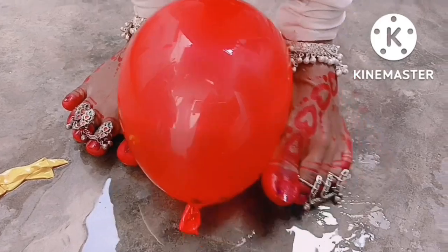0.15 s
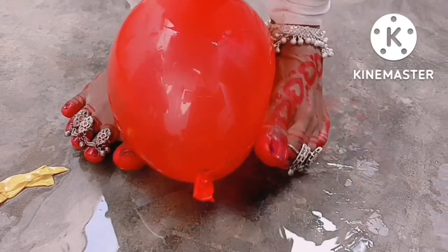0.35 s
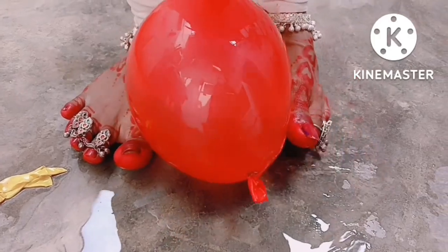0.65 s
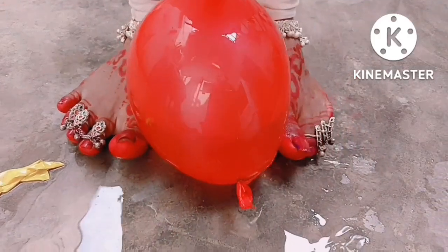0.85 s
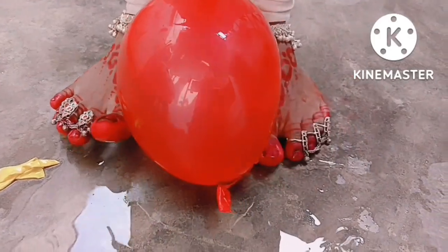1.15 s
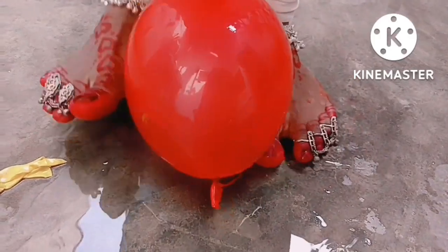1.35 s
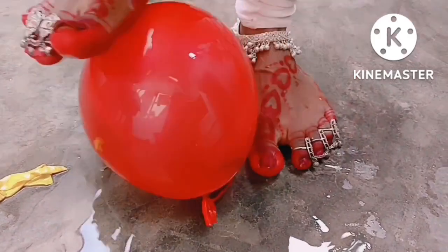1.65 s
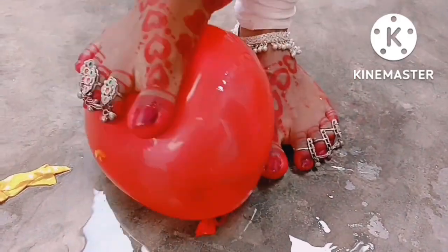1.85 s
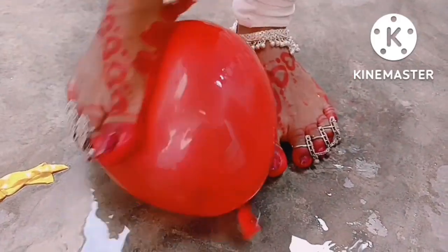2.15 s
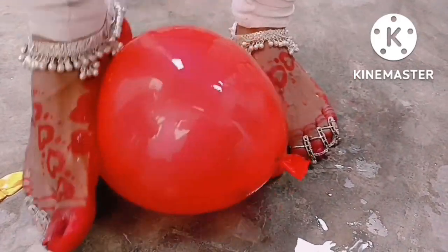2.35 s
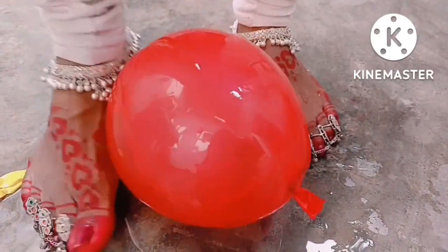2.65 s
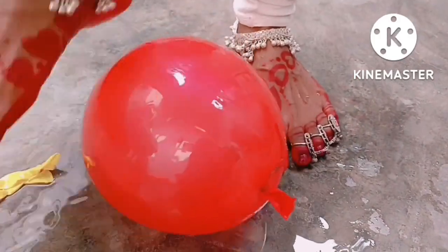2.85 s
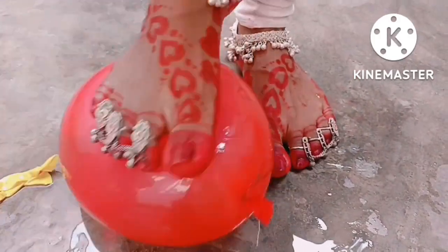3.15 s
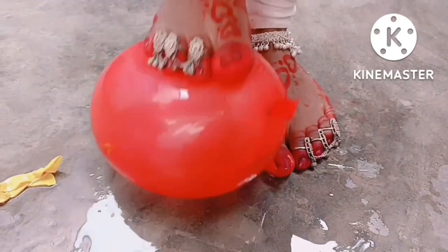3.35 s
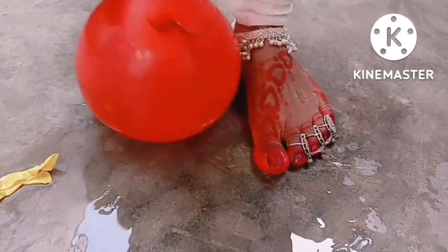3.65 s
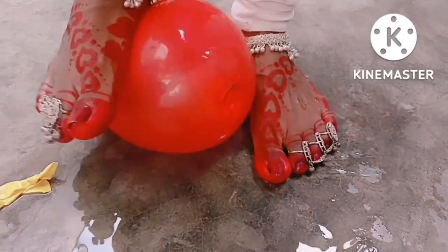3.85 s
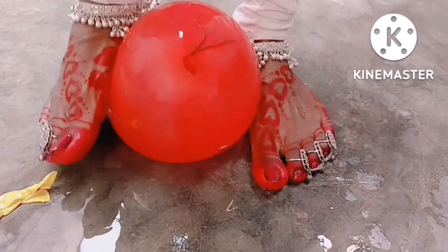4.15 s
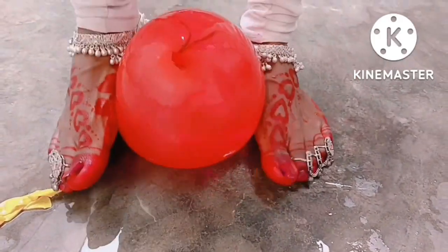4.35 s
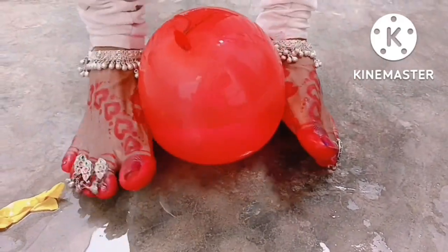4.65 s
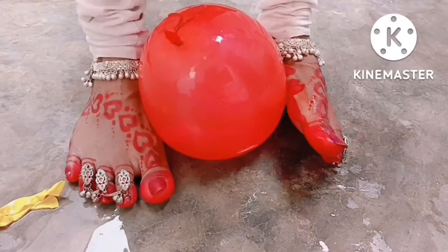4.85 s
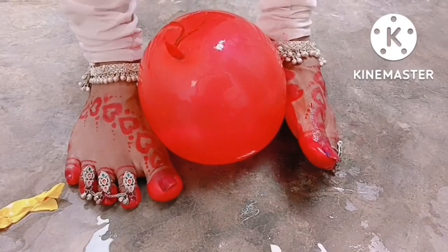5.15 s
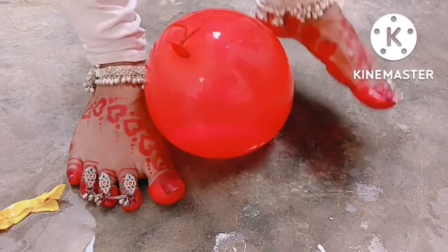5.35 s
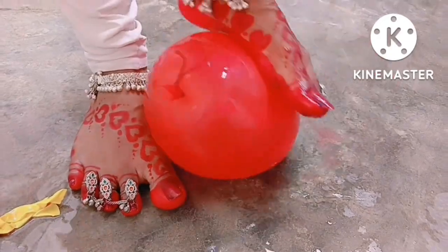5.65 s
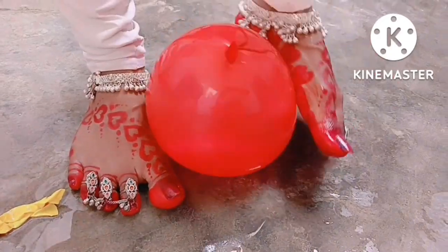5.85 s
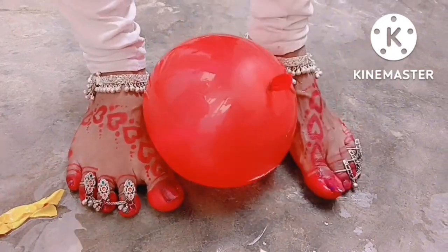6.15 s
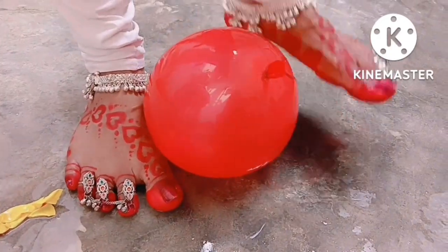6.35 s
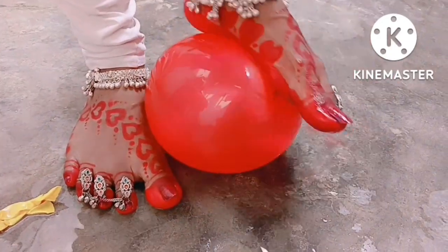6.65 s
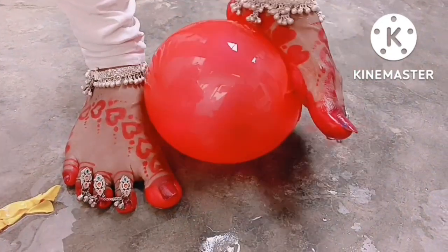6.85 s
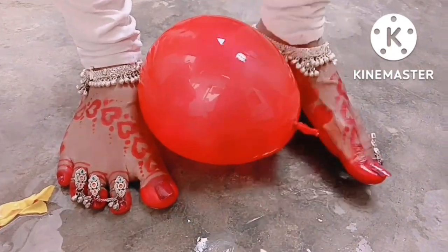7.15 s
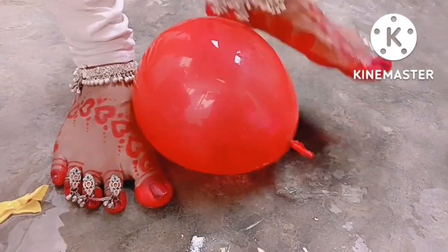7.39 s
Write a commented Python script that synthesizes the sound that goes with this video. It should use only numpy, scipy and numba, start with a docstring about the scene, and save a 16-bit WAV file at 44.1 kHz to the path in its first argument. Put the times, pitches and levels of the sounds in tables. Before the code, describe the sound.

Close stereo sound in a small yard with a very short, dry tail and faint air noise. At first it is nearly quiet: tiny anklet bells chink at about 0.1 s, with soft far tones under half a second. Around 1 s a dull rubber slip thuds; from 1.4 to 1.7 s there is low creaking and short squeaks that swoop upward, dip and rise again. At 2.1 s comes the loudest low thump and creak, with a wavering squeak. Bells jingle brightly at 2.6-3.2 s as wet rubber scrapes the floor and a toe ring clicks. A quickening stutter rubs at 3.3-3.4 s, then a hollow squeaky burst at 3.9 s. Scattered slips and chinks follow through 5 s. Sharper ring ticks and scraping land near 5.8-5.9 s, a low squeak at 6.7 s, and another hollow rub with thin bells at 7.1-7.4 s before it fades.

```python
"""Tiny anklet bells chink first, each a decaying sine; then bare feet roll and press a rubber balloon
on a wet concrete floor. Skin sticks and slips on the rubber: creaks, single slips and a stutter excite
resonances of the balloon's wall and air, and squeaks are harmonic tones on their own slip rate.
Wet rubber scrapes the floor in showers of chirps and toe rings tick as short partials.
A brief noise tail is the small yard's answer, over faint air noise and soft far tones."""
import sys
import numpy as np
from scipy import signal
from scipy.fft import rfft, irfft
from scipy.io import wavfile
from scipy.ndimage import uniform_filter1d
from numba import njit

SR = 44100
rng = np.random.default_rng(int(sys.argv[2]) if len(sys.argv) > 2 else 0)


def inscribe(sig):
    """Save sig as 16-bit PCM at rate SR to the path in sys.argv[1].

    A 1-D sig is mono; a 2-D sig holds one channel per row.
    Samples are clipped to [-1, 1] before scaling.
    """
    pcm = np.round(np.clip(np.atleast_2d(sig).T, -1, 1) * 32767)
    wavfile.write(sys.argv[1], SR, pcm.astype(np.int16))


N = 331632  # samples

# Modes of the air inside. Each row: resonance in Hz, bandwidth in Hz, relative gain in dB.
AIR_MODES = [(630, 90, -2), (770, 80, 0), (890, 70, -1)]
# Upper modes of the rubber wall. Each row: resonance in Hz, bandwidth in Hz, relative gain in dB.
UPPER_MODES = [(1350, 350, -6), (1780, 200, 0), (2120, 250, -1), (2780, 250, -2), (3450, 450, -5)]


def balloon(creak_gain, air_gain):
    """Stick-slip friction: a train of slips excites wall and air; single slips and squeaks join it."""
    slip_hz = 260 * np.exp(.36 * fits(rate=28))
    train = slips(slip_hz, jitter=.14, scatter_db=3) + 0.05 * rng.standard_normal(N)
    creak = even(squeeze(wall(train))) * creak_gain
    hum = even(air(train)) * air_gain
    return creak + hum + single_slips() + squeaks()


def single_slips():
    """Impulse response: each sudden release of the skin rings wall, air and upper modes once."""
    # Each row: ring peak in seconds, relative wall level in dB, air drive minus wall drive in dB.
    slip_rows = [(0.944, -61, 17), (0.991, -17.5, -15.5), (1.039, -17, -18), (1.678, -34.5, 7.5),
                 (2.036, -36.5, 0), (2.05, -30, 0), (2.071, -24, -4), (2.085, -8.5, -43),
                 (2.859, -23.5, 0.5), (3, -37, 7.5), (3.905, -20.5, -1), (3.915, -26, -4),
                 (3.925, -19.5, 2.5), (3.943, -20, 7), (3.954, -27, 5), (4.219, -29, 2.5),
                 (4.237, -19.5, -6.5), (4.256, -27, -1.5), (4.358, -31.5, 1), (4.393, -30, -4.5),
                 (4.712, -22.5, -8), (4.727, -26, -10), (4.748, -20, -10.5), (4.762, -25.5, -22),
                 (4.784, -21.5, -18), (4.794, -30.5, -12), (5.025, -20.5, -14.5), (5.593, -28, -8),
                 (5.67, -20.5, -4), (5.682, -19.5, -5.5), (6.022, -30.5, 0), (6.116, -24, -13),
                 (6.151, -26, -28), (6.222, -31.5, -6.5), (6.787, -21.5, -8.5)]
    s, db, air_rel_db = np.transpose(slip_rows)
    wall_blows, air_blows = np.zeros(N), np.zeros(N)
    at = ((s - 0.0008) * SR).astype(int)  # the skin starts to let go just before the ring peaks
    wall_blows[at], air_blows[at] = undb(db), undb(db + air_rel_db)
    out = wall(push(wall_blows, 0.0008)) * undb(9)
    out += air(push(air_blows, 0.0014)) * undb(22.0)
    upper = steep(ring(wall_blows + air_blows, UPPER_MODES), 2060, "low")
    return out + upper * undb(12.5)


def squeaks():
    """Sustained stick-slip is periodic: harmonics of the slip rate, some raised by the modes."""
    # One list per squeak. Each row: time in seconds, mean slip rate in Hz, relative level in dB.
    squeak_curves = [
        [(1.46, 805, -35), (1.478, 865, -29.5), (1.495, 988, -31), (1.515, 1130, -34.5)],
        [(1.515, 803.3, -30.5), (1.53, 492, -36), (1.58, 394.6, -31), (1.602, 474, -32.5), (1.62, 767, -26.5),
         (1.648, 935, -35.5)],
        [(2.085, 250.1, -45), (2.11, 402.6, -24.5), (2.15, 317.4, -29.5), (2.188, 425.4, -28.5),
         (2.23, 400.6, -33)],
        [(1.36, 125, -45), (1.41, 117.6, -40.5), (1.475, 124, -43)],
        [(3.866, 790, -26), (3.912, 827, -33)],
        [(6.6, 209.9, -42), (6.655, 243.6, -37), (6.685, 463.7, -38.5), (6.71, 481.6, -37), (6.74, 264.4, -35),
         (6.8, 194.4, -42.5)],
    ]
    noise = ring(rng.standard_normal(N), AIR_MODES + UPPER_MODES)
    rasp = unit(steep(noise, 2600, "low"))
    waver = unit(uniform_filter1d(rng.standard_normal((2, N)), size=150))
    sung = 0
    for squeak in squeak_curves:
        hz = read(squeak)[0]
        db = read(squeak, outside=-150)[1]
        phase = 2 * np.pi * np.cumsum(hz * (1 + .022 * waver[0])) / SR
        tone = sum(.6 ** k * np.sin((k + 1) * phase) for k in range(8))
        tone *= 1 + 0.32 * np.cos(phase / 2) * (waver[1] > 0)  # at times strong and weak slips alternate
        tone += 0.061 * (1 + np.cos(phase)) * rasp  # a rasp on every slip
        level = uniform_filter1d(undb(db), size=350) * undb(2 * waver[1])
        sung += np.sqrt(2) * tone * level
    sung += 0.24 * ring(sung, AIR_MODES + UPPER_MODES)  # overtones that meet a mode stand out
    return steep(steep(sung, 70, "high"), 3000, "low")


def stutter():
    """Slow stick-slip under the sole: nearly even slips quicken and ring air, wall and upper modes."""
    # Each row: time in seconds, slip rate in Hz, relative level in dB, upper modes minus air in dB.
    stutter_curve = [(3.262, 78.25, -48.5, 8), (3.3, 111.9, -43, 7), (3.36, 124.9, -31.5, -12),
                     (3.39, 199, -33.5, -0.5), (3.43, 260, -47, -6)]
    train = slips(read(stutter_curve)[0], jitter=.12, scatter_db=3)
    gain, bright = undb(read(stutter_curve, outside=-150)[1:])
    upper = steep(steep(ring(train, UPPER_MODES), 3260, "low"), 3800, "low")
    return (unit(air(train)) + 0.34 * unit(wall(train)) + bright * unit(upper)) * gain


def air(x):
    """Cavity resonance: the air inside rings mainly between 0.6 and 1 kHz."""
    x = steep(ring(x, AIR_MODES), 966, "low")
    return steep(steep(x, 1036, "low"), 607, "high")


def wall(x):
    """Membrane resonance: the low modes of the rubber wall thud."""
    # Modes of the wall at rest. Each row: resonance in Hz, bandwidth in Hz, relative gain in dB.
    wall_modes = [(125.5, 29, -2), (190.3, 54, 5), (267, 89, -3), (353, 103, 0.5)]
    return steep(steep(ring(x, wall_modes), 444, "low"), 112.7, "high")


def squeeze(x):
    """Tension sets pitch: as pressure stretches the rubber, reading speed slides all modes together."""
    return np.interp(np.cumsum(1 + .12 * fits(rate=9)) % N, np.arange(N), x)


def slips(hz, jitter, scatter_db):
    """Relaxation oscillation: one pulse each time the skin lets go; gaps and sizes vary."""
    chance = rng.standard_normal((N // 40, 2))
    steps = np.cumsum(np.exp(jitter * chance[:, 0]))
    at = np.searchsorted(np.cumsum(hz) / SR, steps)
    inside = at < N
    out = np.zeros(N)
    np.add.at(out, at[inside], undb(scatter_db * chance[inside, 1]))
    return out


def push(x, s):
    """Finite release time: skin lets go over s seconds, which softens each pulse."""
    return signal.lfilter(np.hanning(int(s * SR)), 1, x)


def scrape(drag_gain, fine_gain):
    """Friction noise: wet rubber on concrete sheds chirps around the upper modes and a finer hiss."""
    hz, width, db = np.array(UPPER_MODES)[rng.integers(len(UPPER_MODES), size=9000)].T
    hz = hz + .6 * width * rng.standard_normal(len(hz))
    rough = grit(hz, db, t60=.024, spread_db=1.4, pan_db=3)
    hiss_hz = rng.uniform(3650.0, 8280.0, size=12000)
    hiss = grit(hiss_hz, 0, t60=0.0068, spread_db=2, pan_db=3.5)
    jerks = undb(2 * fits(rate=31))
    return even(rough * jerks) * drag_gain + even(hiss * jerks) * fine_gain


def grit(hz, db, t60, spread_db, pan_db):
    """Superposed micro-impacts: decaying chirps of unequal size, one per pitch, strewn over time."""
    chance = rng.random((len(hz), 2)).T
    size_db = db - spread_db * np.log(chance[1] + 0.019)
    return unit(strike(chance[0] * N / SR, hz, np.full(len(hz), t60), size_db, pan_db, turn=1.0))


def toe_rings():
    """Modal impact: each tick is a light touch, then the blow, with a few fast-decaying partials."""
    # Each row: time in seconds, relative level in dB, nominal pitch in Hz.
    tick_rows = [(2.136, -20, 2590), (2.8586, -14, 2430), (3.0036, -30.5, 1740), (3.388, -27.5, 1700),
                 (3.8132, -23, 2330), (4.0698, -20, 1390), (4.09, -33, 1980), (4.128, -26, 3650),
                 (4.336, -29, 3380), (5.7866, -15.5, 1960), (5.871, -26, 2210), (5.915, -29, 3170),
                 (5.9415, -10.5, 2124)]
    # Each row: nominal multiple of the pitch, relative level in dB.
    partials = [(1.001, 3.5), (1.429, -5), (1.75, -10), (2.5, -10)]
    s, db, hz = np.transpose(tick_rows)
    t60 = np.full(len(s), .015)
    out = 0
    for multiple, part_db in partials:
        for late, late_db in [(-.002, -7.5), (.001, -2.5)]:  # touch, blow: (s, dB)
            detune = 1 + 0.042 * rng.standard_normal(len(s)) * (multiple > 1)
            level_db = db + part_db + late_db
            out = out + strike(s + late, hz * multiple * detune, t60, level_db, pan_db=5.0, turn=0.79)
    return out


def anklets():
    """Struck small resonators: a random shower of weak chinks and rustle under the loud chinks."""
    # Shakes of an ankle. Each row: peak in seconds, rise in seconds, fall in seconds,
    # relative bell level in dB.
    shakes = [(0.172, 0.15, 0.2, -40), (0.434, 0.0039, 0.12, -47.5), (0.659, 0.036, 0.52, -50.5),
              (1.399, 0.31, 0.19, -44), (1.759, 0.44, 0.19, -54.5), (2.118, 0.042, 0.84, -43),
              (2.522, 0.24, 0.058, -32), (2.68, 0.18, 0.66, -30.5), (3.607, 0.16, 1.1, -37.5),
              (3.876, 0.1, 0.13, -27.5), (3.93, .1, 0.79, -38.5), (4.65, 0.46, 0.17, -47),
              (4.759, 0.041, 0.12, -27.5), (5.051, 0.067, 0.079, -43.5), (5.545, 1.27, 3, -40.5),
              (6.286, 0.49, 0.11, -41.5), (6.712, 0.74, 0.12, -39.5), (7.109, 0.06, 0.73, -36.5),
              (7.363, 0.62, 0.26, -33.5)]
    # Bell level between shakes. One column: relative level in dB.
    shake_rest_db = [-95]
    shake_gain = swells(shakes, shake_rest_db)[0]
    moving = (unit(bell_shower()) + 0.36 * unit(bell_rustle())) * undb(3.6 * fits(rate=45))
    return even(moving) * shake_gain + loud_chinks()


def bell_shower():
    """Random impacts: one jolt wakes three bells, each a brief decaying sine."""
    # One column: nominal bell pitch in Hz.
    bells_hz = [9490, 10400, 10460, 11240, 11600, 11900, 13300]
    when, which, delay, size = rng.random((2400, 4)).T
    s = np.repeat(when[::3], 3) * N / SR + .003 * delay
    hz = np.array(bells_hz)[(which * len(bells_hz)).astype(int)]
    hz = hz * (1 + 0.111 * (rng.random(len(s)) - .5))
    t60 = 0.0035 + 0.041 * delay ** 2
    db = -4.5 * np.log(np.repeat(size[::3], 3) + 0.0055) - 6 * size
    return strike(s, hz, t60, db, pan_db=11.5, turn=1.0)


def bell_rustle():
    """Dense contacts merge into band noise."""
    return steep(rng.standard_normal((2, N)), [8500, 14200], "band")


def loud_chinks():
    """Clapper impact: a ringing bell, the clapper's noise burst and a faster-dying neighbour bell."""
    # Each row: time in seconds, relative level in dB, pitch in Hz.
    chink_rows = [(0.135, -31, 12400), (2.2217, -31.5, 9740), (2.6324, -29, 10430), (2.663, -15.5, 11640),
                  (2.9824, -24.5, 9980), (3.033, -21.5, 9850), (3.148, -36, 12700), (3.205, -41, 10600),
                  (3.2187, -35.5, 9970), (3.5686, -29, 10800), (3.873, -20.5, 9780), (4.394, -18, 11140),
                  (4.518, -37, 11570), (4.723, -29, 11000), (4.7536, -24.5, 11800), (4.9464, -37, 12110),
                  (5.027, -28.5, 7810), (5.033, -24.5, 12560), (6.154, -23, 11940), (6.2555, -21.5, 11720),
                  (6.5316, -24.5, 9000), (6.6694, -25.5, 8740), (6.71, -24.5, 10480), (7.095, -26, 12880),
                  (7.1477, -24, 13150), (7.327, -22, 10860), (7.3678, -20.5, 12600)]
    s, db, hz = np.transpose(chink_rows)
    out = strike(s, hz, np.full(len(s), .045), db + 0.5, pan_db=8.5, turn=3.07)
    blows = np.zeros(N)
    blows[(s * SR).astype(int)] = undb(db - 16.0)
    clack = rng.standard_normal((2, 600)) * np.exp(-np.arange(600) / (0.0043 * SR))
    rattle = signal.fftconvolve(ports(blows, pan_db=4.5), clack, axes=1)[:, :N]
    out += steep(rattle, 2900, "high")
    neighbour_hz = hz * (0.661 + 0.37 * rng.random(len(s)))
    return out + strike(s, neighbour_hz, np.full(len(s), .006), db - 4.5, pan_db=-4.0, turn=0.23)


def echoes(x, t60, db):
    """Diffuse reverberation off floor, legs and walls: unrelated noise tails, weak in the bass."""
    t = np.arange(int(t60 * SR)) / SR
    tail = rng.standard_normal((2, len(t))) * np.exp(-np.log(1000) * t / t60) * (t > .002)
    tail = signal.lfilter(*signal.butter(1, 90, "high", fs=SR), tail)
    tail = tail / np.sqrt(np.sum(tail[0] ** 2))
    return x + undb(db) * signal.fftconvolve(x, tail, axes=1)[:, :N]


def yard():
    """Diffuse-field coherence: air noise most alike left and right in the bass, plus far tones."""
    # Spectrum of the air noise. Each row: frequency in Hz, relative spectral level in dB.
    air_spectrum = [(25, 0.5), (80, 14), (300, -16.5), (1200, -12.5), (5000, -11), (12000, -24)]
    # Each row: start in seconds, end in seconds, frequency in Hz, mean level in dB.
    far_tones = [(0.275, 0.323, 240, -56), (0.45, 0.535, 215, -55), (0.37, 0.476, 420, -51),
                 (7.317, 7.562, 322, -49)]
    f = np.fft.rfftfreq(N, 1 / SR) + 1
    curve_hz, curve_db = np.transpose(air_spectrum)
    gain = undb(np.interp(np.log(f), np.log(curve_hz), curve_db))
    mid, side = rfft(rng.standard_normal((2, N)))
    side = side * np.clip(f / 1500 + 0.15, 0, 1)
    out = unit(irfft(gain * np.array([mid + side, mid - side]), N)) * undb(-67.5)
    t = np.arange(N) / SR
    for start, end, hz, db in far_tones:
        swell = np.sin(np.pi * np.clip((t - start) / (end - start), 0, 1))
        out += undb(db + 3.4 * fits(rate=30)) * np.sin(2 * np.pi * hz * t) * swell
    return out


def swells(table, rest_db):
    """Incoherent addition: movements rise and fall evenly in dB, adding in power over a resting level."""
    swing_db = 30  # climbed in the rise time, sunk in the fall time
    t = np.arange(0, N + 32, 32) / SR
    power = 0
    for s, rise, fall, *db in table:
        down = np.maximum((s - t) / max(rise, 1e-3), (t - s) / max(fall, 1e-3))
        power = power + undb(np.array(db)[:, None] - swing_db * down) ** 2
    gains = np.sqrt(power + undb(rest_db)[:, None] ** 2)
    return [np.interp(np.arange(N) / SR, t, g) for g in gains]


def fits(rate):
    """Irregular motion: random levels held 1 / rate seconds and joined smoothly."""
    k = int(SR / rate)
    return uniform_filter1d(np.repeat(rng.standard_normal(N // k + 1), k)[:N], size=k // 3)


def ports(x, pan_db):
    """Time and level difference: right leads by a fifth of a millisecond; positive pan favours left."""
    return np.array([np.roll(x, shift=8), x]) * undb([[pan_db / 2], [-pan_db / 2]])


def strike(s, hz, t60, db, pan_db, turn):
    """Level panning: positive pan favours left; chance turns the phase of each path."""
    spin = np.exp(1j * turn * rng.standard_normal(len(s)))
    left = undb(db + pan_db / 2) * spin
    right = undb(db - pan_db / 2) / spin
    return pings(s, hz, t60, left, right, 0.00011 * SR, N)


@njit
def pings(s, hz, t60, left, right, soft, n):
    """Free damped vibration: decaying sines with their own complex gain in each channel."""
    out = np.zeros((2, n))
    for k in range(len(s)):
        p = np.exp(2j * np.pi * hz[k] / SR - np.log(1000) / (t60[k] * SR))
        z = 1 + 0j
        i0 = int(s[k] * SR)
        for i in range(i0, min(n, i0 + int(t60[k] * SR))):
            rise = min((i - i0) / soft, 1.)
            out[0, i] += rise * (left[k] * z).imag
            out[1, i] += rise * (right[k] * z).imag
            z *= p
    return out


def ring(x, modes):
    """Modal superposition: a sum of two-pole resonances."""
    out = 0
    for hz, width, db in modes:
        out = out + undb(db) * signal.lfilter(*signal.iirpeak(hz, hz / width, SR), x)
    return out


def steep(x, hz, kind):
    """Band limiting by a Butterworth filter of design order four."""
    return signal.sosfilt(signal.butter(4, hz, kind, fs=SR, output="sos"), x)


def even(x):
    """Short-time rms about 1 over a tenth of a second: grain stays, motion sets the level."""
    power = uniform_filter1d(np.mean(np.atleast_2d(x) ** 2, axis=0), size=SR // 10)
    return x / np.sqrt(power + 1e-18)


def unit(x):
    """Power normalisation to rms 1."""
    return x / np.sqrt(np.mean(x ** 2) + 1e-18)


def undb(db):
    """Logarithmic level: dB to amplitude gain."""
    return 10 ** (np.asarray(db) / 20)


def read(table, outside=None):
    """Linear interpolation: each column of a curve, one value a sample."""
    s, *columns = np.transpose(table)
    return [np.interp(np.arange(N) / SR, s, c, outside, outside) for c in columns]


def scene():
    """Superposition of near sources and their echoes over the yard; the balloon is slightly louder left."""
    # Strokes of a foot over the balloon. Each row: peak in seconds, rise in seconds, fall in seconds,
    # then relative levels in dB of wall creak, air ring, floor scrape and fine hiss.
    strokes = [(0.434, 0.45, 0.63, -60.5, -72.5, -66, -73.5), (0.64, 0.065, 0.23, -50.5, -62, -52.5, -56.5),
               (0.988, 0.0045, 0.24, -39, -50.5, -54, -100.5), (1.27, 0.13, 1, -80, -72, -46.5, -57.5),
               (1.39, 0.18, 0.28, -35, -48, -41, -45.5), (1.62, 0.39, 0.19, -47, -32.5, -35.5, -73),
               (1.7, 0.093, 0.29, -50, -44, -47.5, -57), (2.1, 0.031, 0.39, -19, -27.5, -36, -49),
               (2.185, 0.097, 0.25, -42, -29, -38, -47.5), (2.36, 0.067, 0.26, -49, -40, -46, -53.5),
               (2.43, 0.062, 0.21, -30, -34.5, -43.5, -48.5), (2.68, 0.35, 0.14, -43, -49, -48, -69),
               (2.84, 0.23, 0.19, -49, -35.5, -30.5, -31.5), (3.001, 0.019, 0.24, -48.5, -44, -44.5, -58),
               (3.395, 0.16, 0.18, -40, -35.5, -38.5, -78), (3.62, 0.2, 1, -70, -55.5, -51, -49.5),
               (3.876, 0.036, 0.078, -49, -22.5, -34.5, -37), (3.95, 0.14, 0.4, -32.5, -30.5, -44, -47.5),
               (4.078, 0.034, 0.3, -61, -50, -35, -45), (4.235, 0.032, 0.21, -35.5, -37, -42.5, -53),
               (4.35, 0.061, 0.08, -40, -41, -42, -46.5), (4.56, 0.23, 0.3, -73, -55.5, -55, -55),
               (4.714, 0.0057, 0.27, -35.5, -39.5, -52, -58), (4.77, 0.05, 0.15, -35.5, -49, -47, -47.5),
               (5.026, 0.0099, 0.29, -46, -53, -61, -50), (5.193, 0.026, 0.17, -48.5, -43.5, -51.5, -51),
               (5.455, 0.0089, 0.093, -80, -41, -40, -57), (5.507, 0.088, 0.28, -56, -51.5, -47, -46.5),
               (5.595, 0.018, 0.079, -44, -37.5, -49, -62), (5.672, 0.01, 0.17, -33, -38, -45, -64),
               (5.79, 0.083, 0.13, -29.5, -24.5, -32, -45.5), (5.934, 0.16, 0.39, -54, -51, -47, -46.5),
               (5.994, 0.087, 0.13, -32, -34.5, -41, -66), (6.121, 0.016, 0.3, -40.5, -43, -46.5, -52),
               (6.25, 0.14, 0.11, -54, -55, -50.5, -48), (6.356, 0.0057, 0.19, -40.5, -45.5, -56.5, -76),
               (6.615, 0.026, 0.25, -38, -37, -55, -67), (6.72, 0.18, 0.1, -44, -38, -41, -44.5),
               (6.772, 0.27, 0.14, -28.5, -34, -39.5, -66), (6.95, 0.39, 0.26, -38.5, -42.5, -45.5, -79),
               (7.05, 0.17, 0.22, -50, -35, -45.5, -70), (7.105, 0.059, 0.24, -36, -28.5, -34.5, -42),
               (7.3, 1, 0.31, -52, -68, -56.5, -49)]
    # Between strokes. Relative levels in dB of wall creak, air ring, floor scrape and fine hiss.
    stroke_rest_db = [-100, -82.5, -82.5, -76]
    creak_gain, air_gain, drag_gain, fine_gain = swells(strokes, stroke_rest_db)
    near = ports(balloon(creak_gain, air_gain) + stutter(), pan_db=0.5)
    near = near + scrape(drag_gain, fine_gain) + toe_rings() + anklets()
    return echoes(near, t60=.1, db=-7) + yard()


def record(dry):
    """Band limiting: a steep elliptic low-pass cuts the treble above 15.3 kHz."""
    return signal.sosfilt(signal.ellip(8, .2, 80, 15300, fs=SR, output="sos"), dry)


dry = scene()
out = record(dry)
inscribe(out)
```